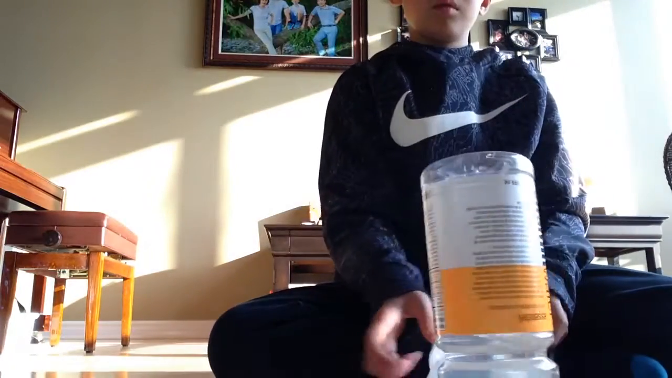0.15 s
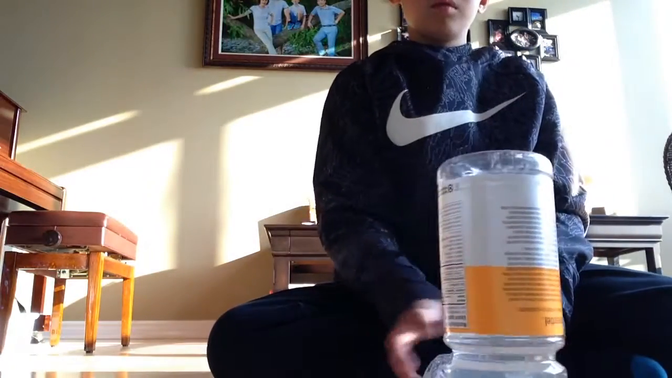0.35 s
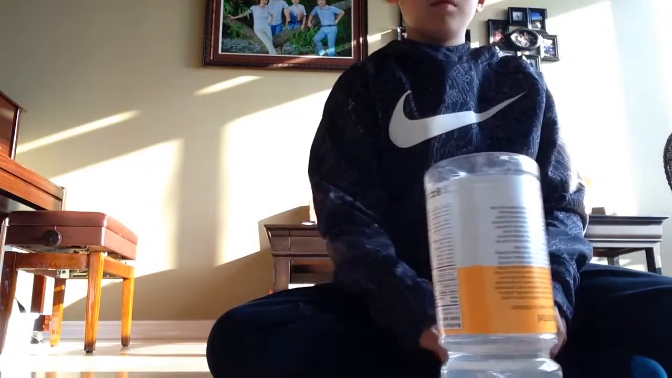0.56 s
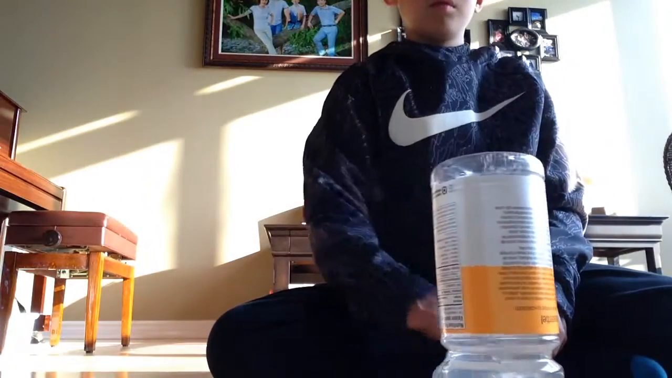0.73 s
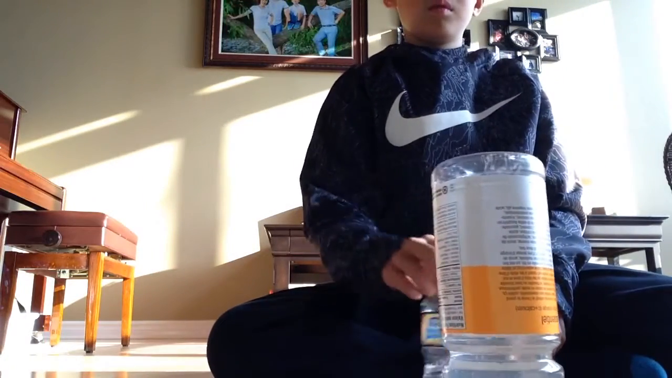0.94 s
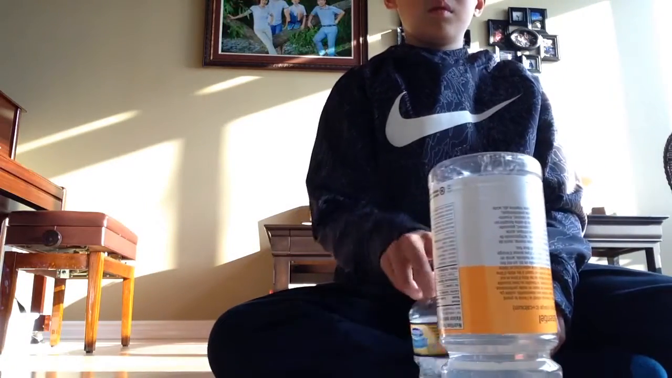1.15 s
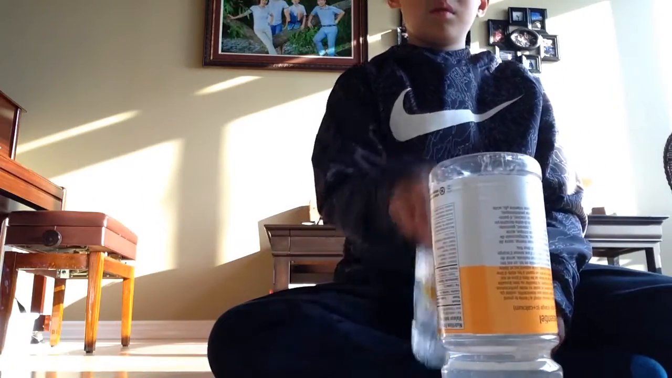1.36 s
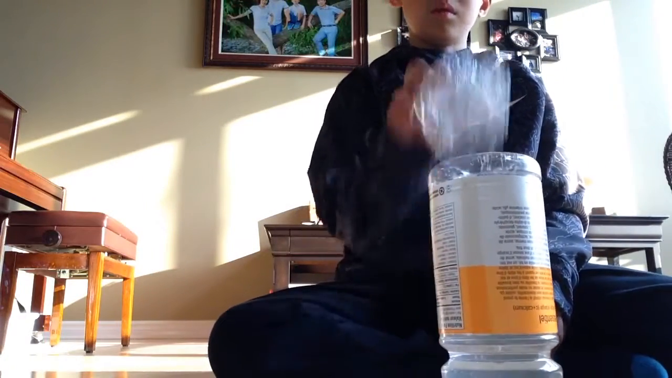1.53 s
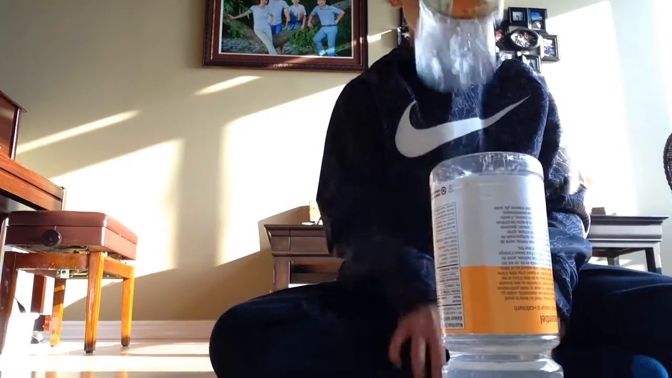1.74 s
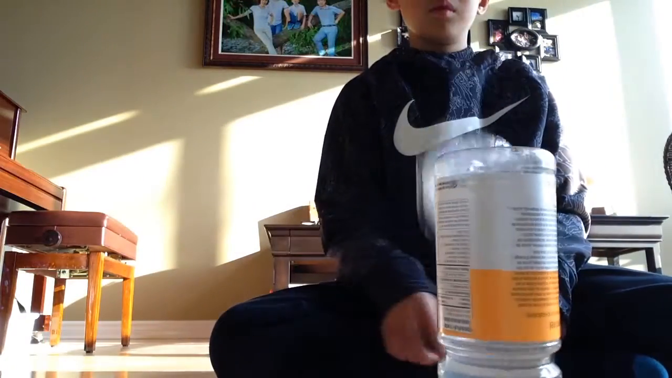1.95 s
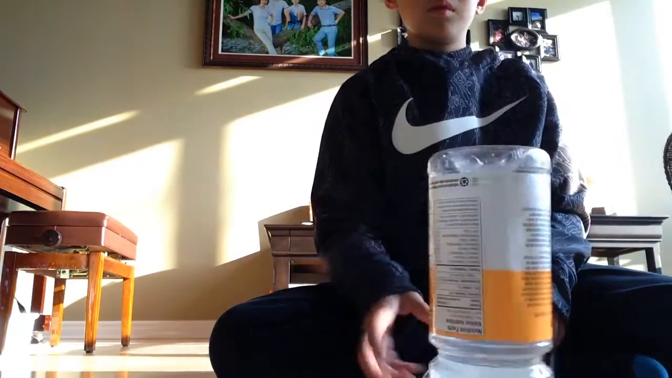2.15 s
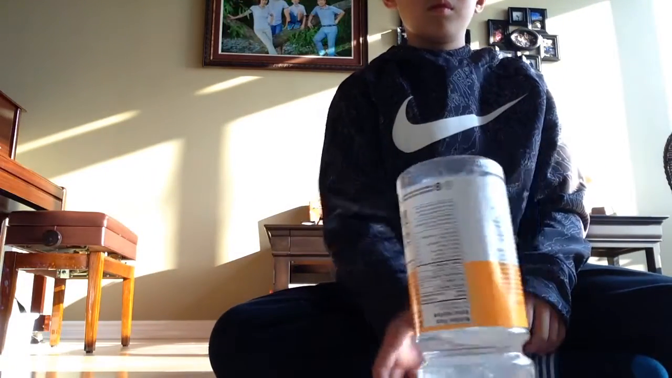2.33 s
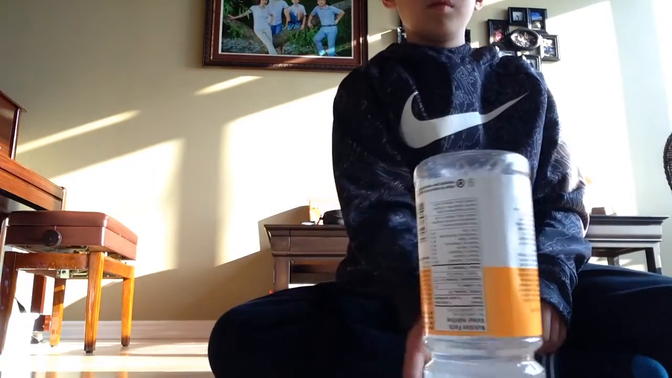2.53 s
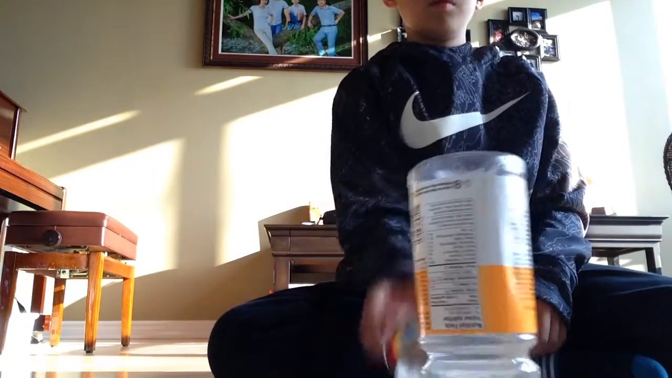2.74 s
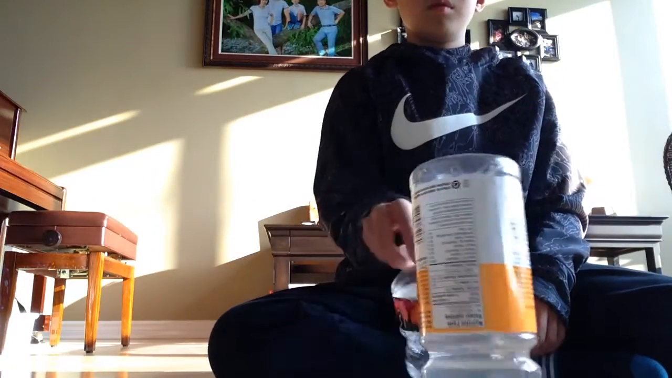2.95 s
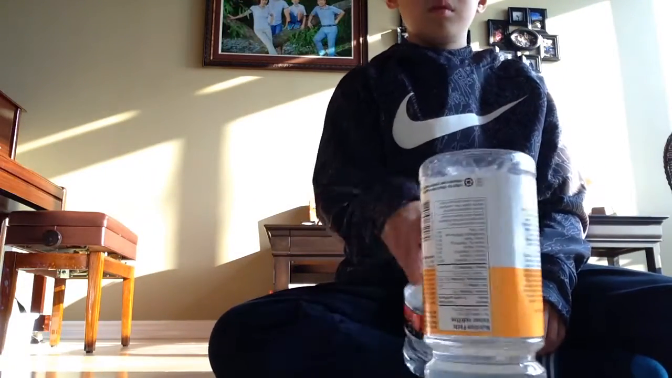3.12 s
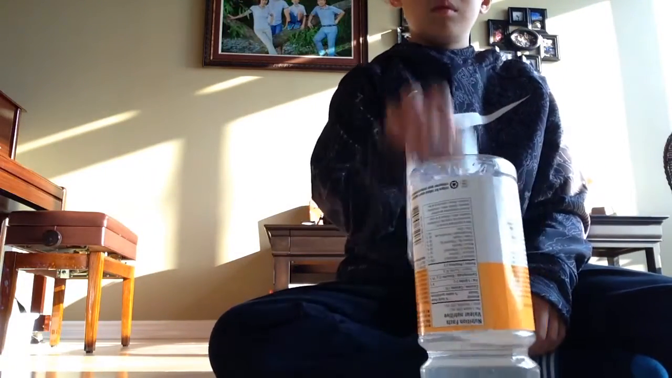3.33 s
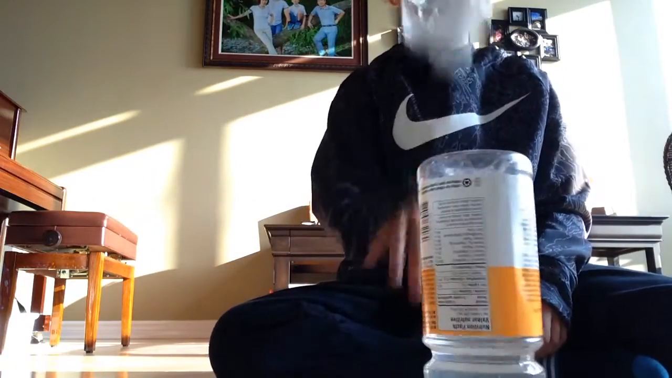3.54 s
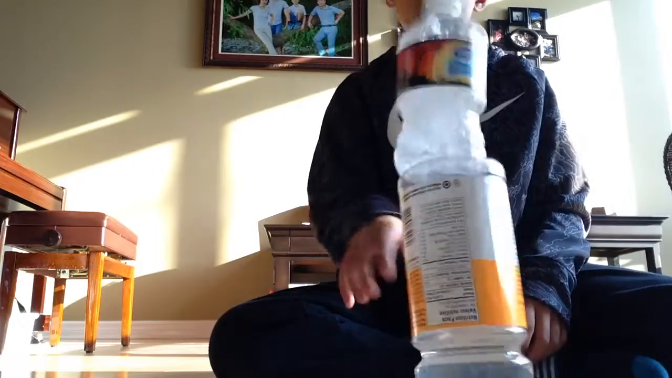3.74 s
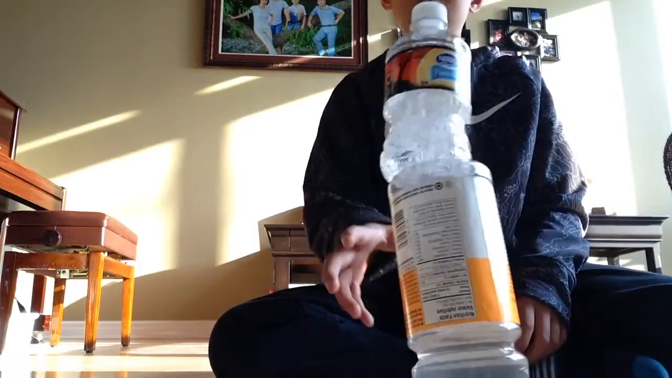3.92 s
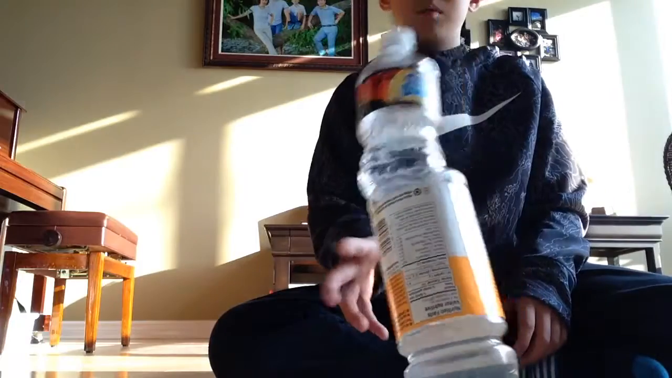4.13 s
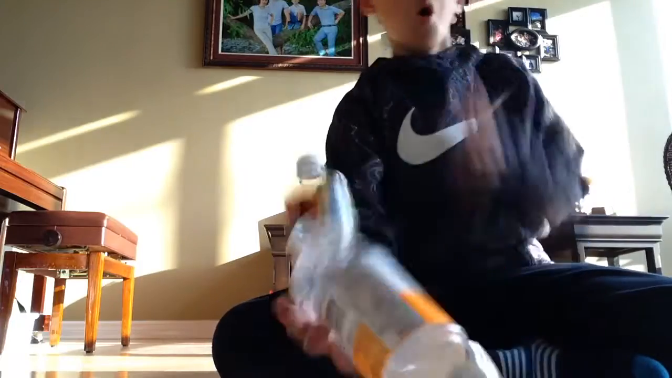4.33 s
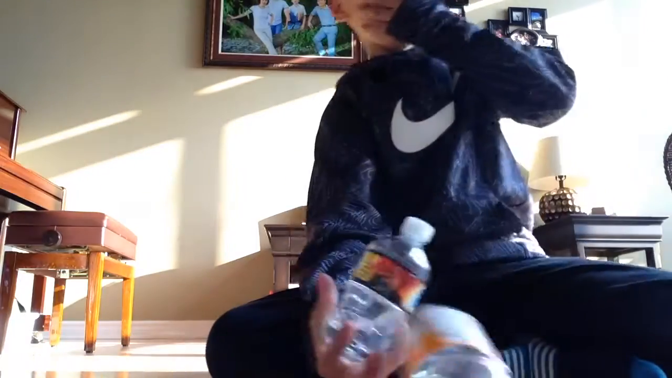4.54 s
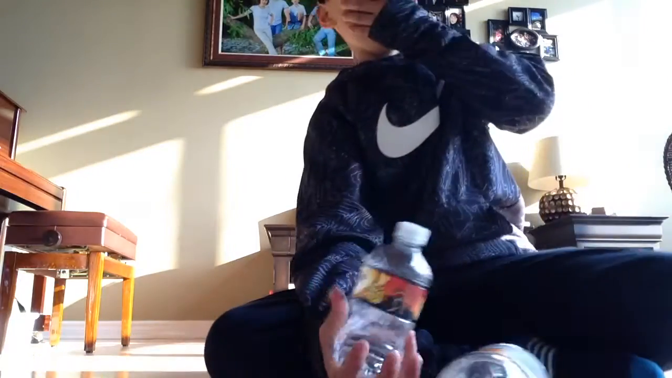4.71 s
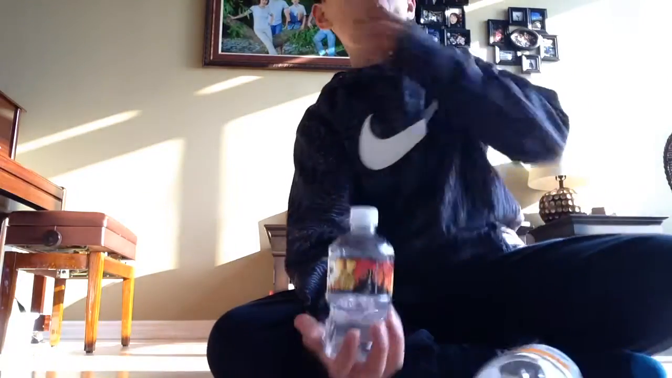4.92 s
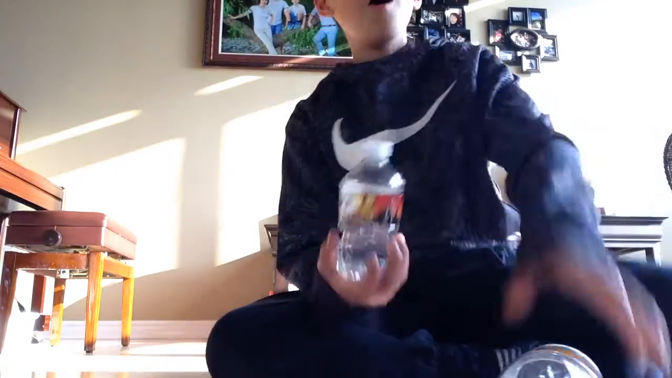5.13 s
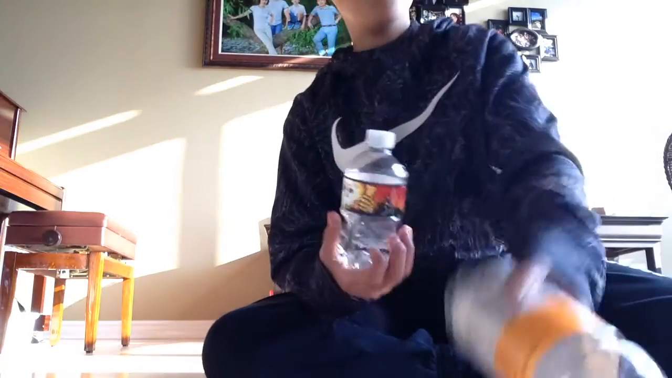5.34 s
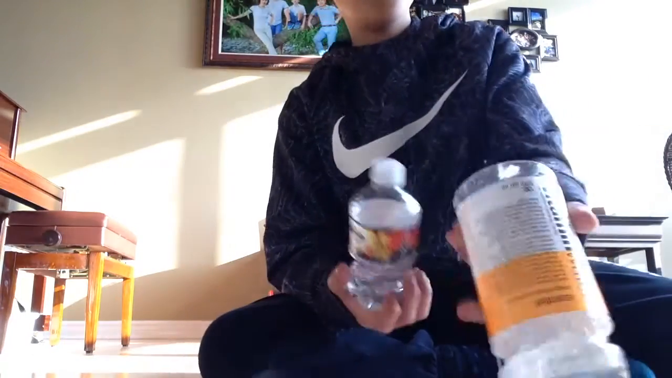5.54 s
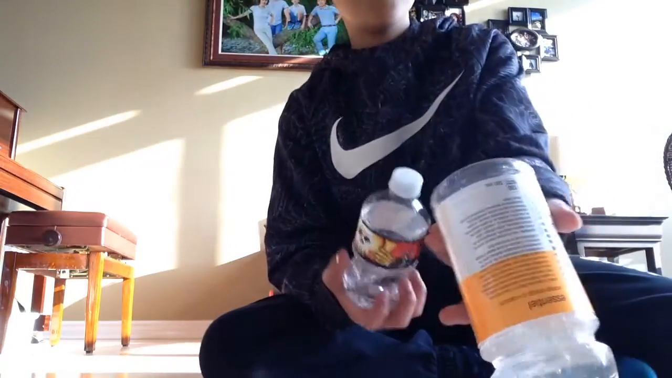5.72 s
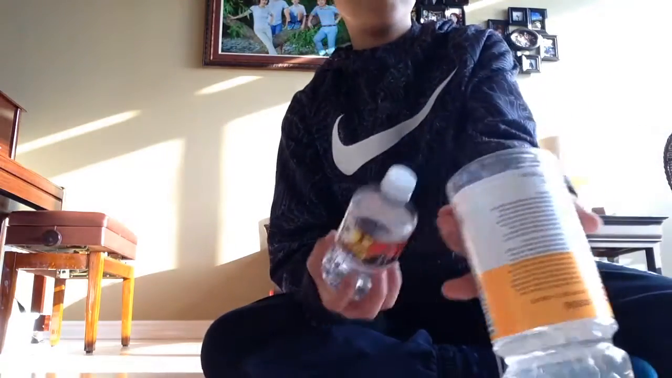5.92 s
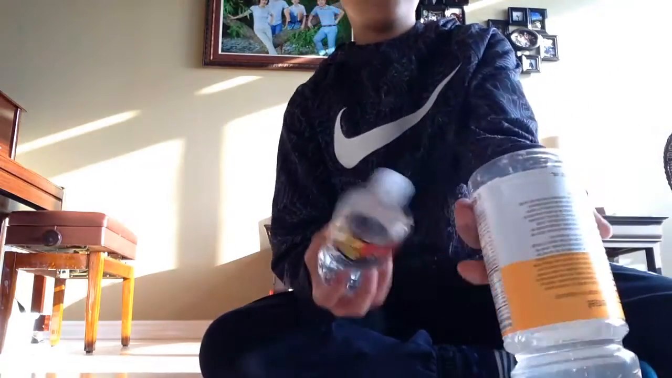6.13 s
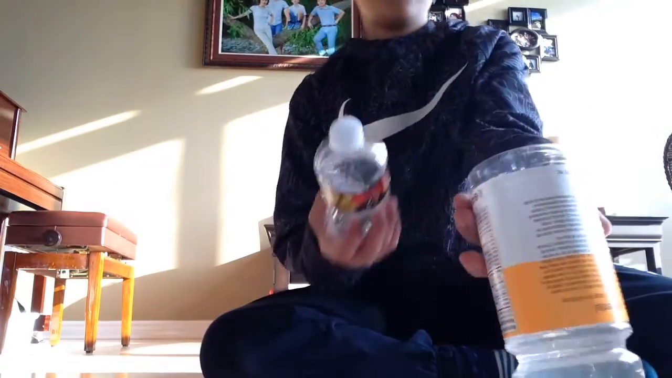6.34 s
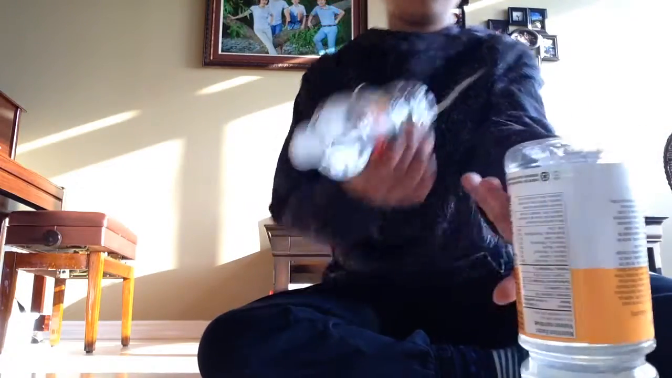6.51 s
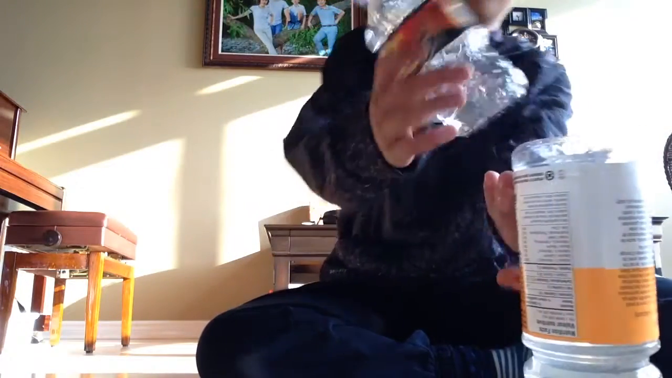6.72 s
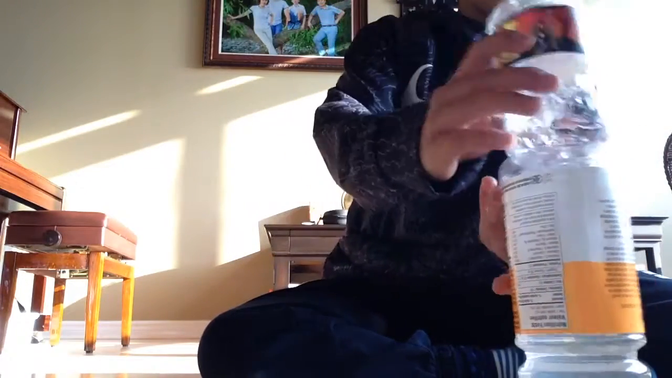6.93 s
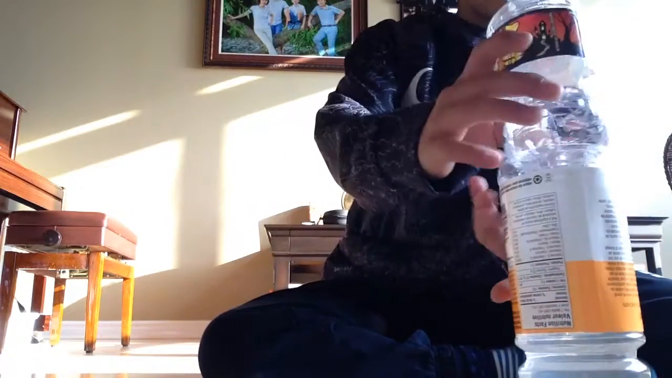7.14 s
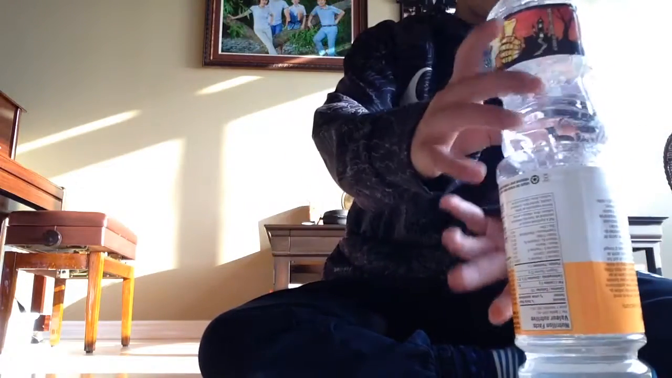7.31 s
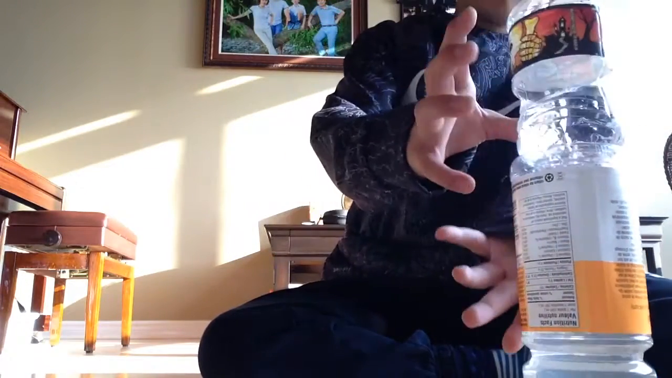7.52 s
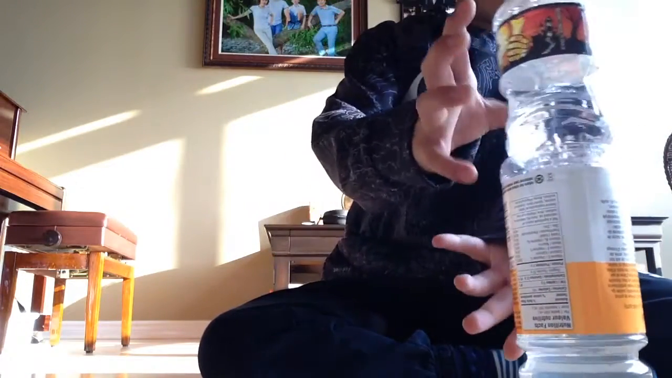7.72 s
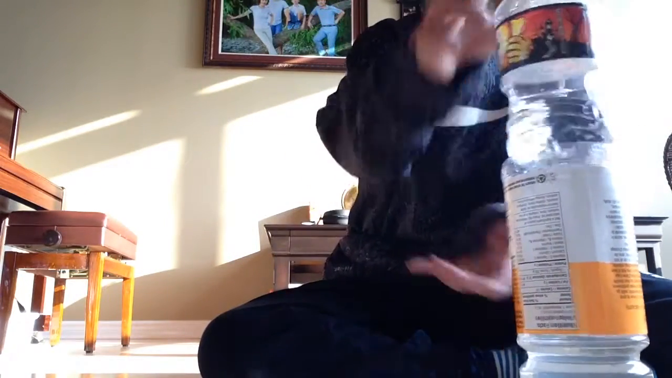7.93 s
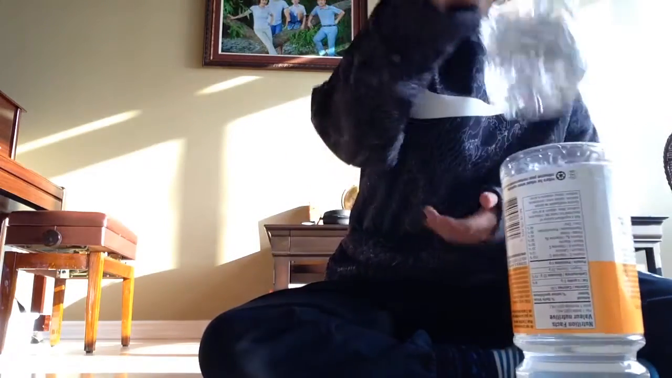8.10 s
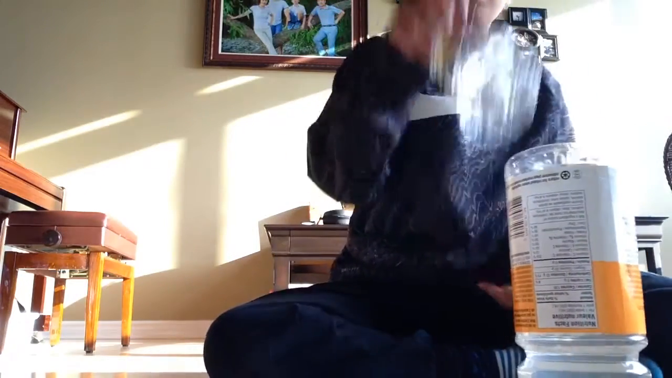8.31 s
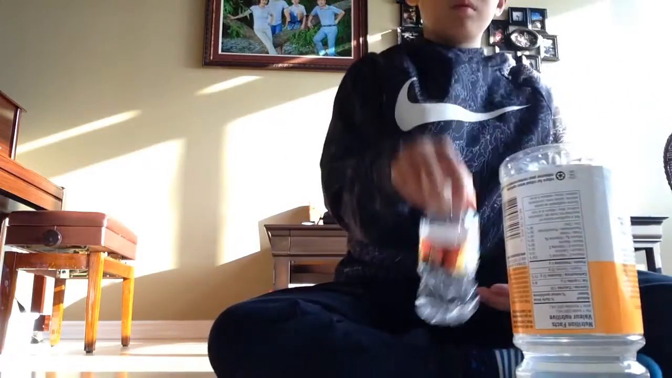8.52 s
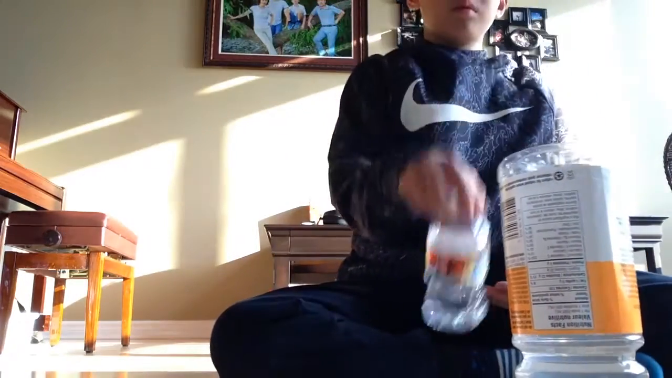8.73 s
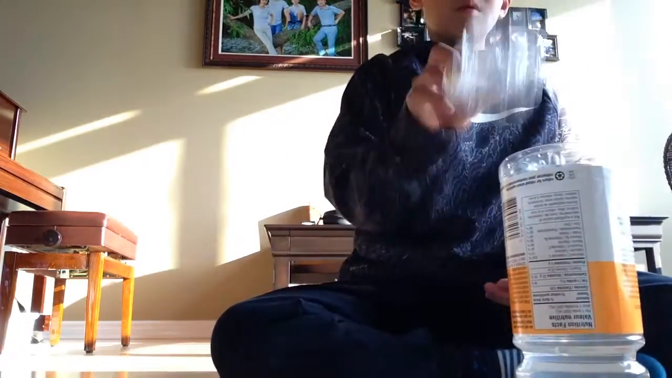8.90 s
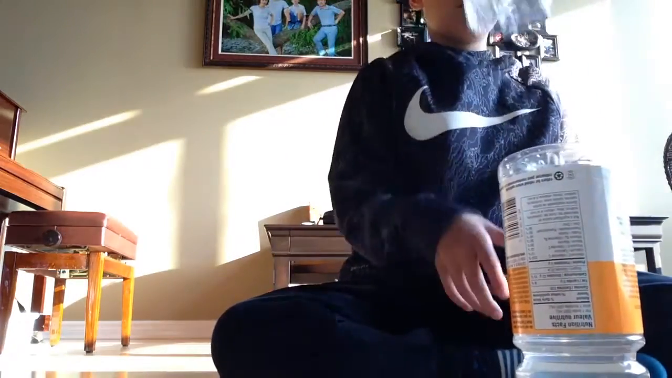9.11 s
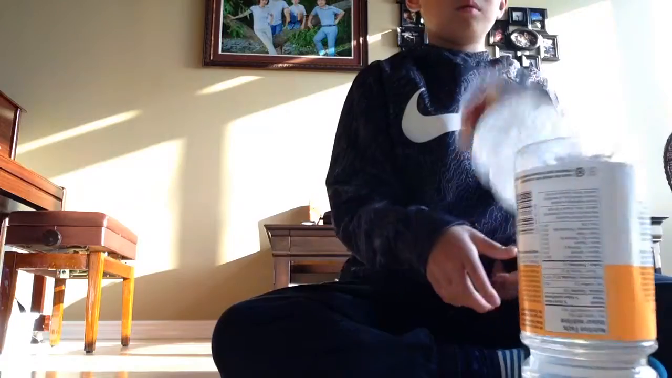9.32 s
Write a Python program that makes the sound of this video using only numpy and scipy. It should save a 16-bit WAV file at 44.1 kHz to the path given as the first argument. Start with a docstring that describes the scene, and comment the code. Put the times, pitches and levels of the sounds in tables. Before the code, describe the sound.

A part-filled plastic bottle lands repeatedly on a hollow plastic jug with loud close booms, water slapping and spattering inside, amid crinkles and rustles.

```python
"""Flipping a water bottle

A part-filled plastic water bottle is flipped onto a big upturned plastic jug, close to the microphone in a
living room. Each landing booms the hollow plastic (damped vibrations); softer follow-up booms come just after
it and the water spatters inside (clouds of tiny drop sounds). Once the jug tips, rolls and falls, as rumbling,
scraping noise. Between throws hands pick up the crinkling bottle and sleeves rustle, as swelling noise. The
loudest blows overload the microphone."""
import sys
import numpy as np
from scipy import signal
from scipy.fft import rfft, irfft, next_fast_len
from scipy.io import wavfile
from scipy.ndimage import map_coordinates

SR = 44100
rng = np.random.default_rng(int(sys.argv[2]) if len(sys.argv) > 2 else 0)


def wrap_up_sound(samples):
    """Save the sound to the file named by the first command line argument, as 16-bit audio."""
    columns = np.atleast_2d(samples).T
    # keep every value between -1 and 1, then stretch to whole-number steps
    tamed = np.clip(columns, -1, 1)
    steps = np.round(tamed * 32767).astype(np.int16)
    wavfile.write(sys.argv[1], SR, steps)


N = 417186  # length in samples
TOP_HZ = 15450  # upper limit of the microphone and of the drop pitches
TIME = np.arange(N) / SR  # s, over the whole scene
AGE = np.arange(SR // 2) / SR  # s, since a sound began


def amp(db):
    """Decibels to gain."""
    return 10 ** (np.asarray(db) / 20)


def unit(x):
    """Scale to rms 1."""
    return x / np.sqrt(np.mean(x ** 2) + 1e-20)


def crest(x):
    """Scale to peak 1."""
    return x / (np.abs(x).max() + 1e-20)


def along(points, hz):
    """Read a curve of (f/Hz, value) points, with straight lines between them on a log pitch axis."""
    f, v = np.transpose(points)
    return np.interp(np.log(hz + 1), np.log(f + 1), v)


def fade(t, t60):
    """Exponential decay, 60 dB in t60."""
    return np.exp(-np.log(1000) * t / t60)


def add(track, s, sound):
    """Mix a sound into a track at time s."""
    start = max(round(s * SR), 0)
    track[start:start + len(sound)] += sound[:N - start]


def coloured(x, spectrum):
    """Make some pitches louder and others softer, by (f/Hz, level/dB) points."""
    m = next_fast_len(len(x) + SR // 10)
    gain = amp(along(spectrum, np.fft.rfftfreq(m, 1 / SR)))
    return irfft(rfft(x, m) * gain, m)[:len(x)]


def noise(spectrum, size=N):
    """Coloured noise of rms 1."""
    return unit(coloured(rng.standard_normal(size), spectrum))


def wobble(rate):
    """A smooth random curve, with rate random points a second."""
    return map_coordinates(rng.standard_normal(int(N * rate / SR) + 4), [TIME * rate])


def stroke(s, length, rise_share=0.43, swell_db=21.5):
    """Gain of one movement: it swells to its peak at time s and dies away; its ends lie swell_db under the peak."""
    before = np.maximum(s - TIME, 0) / (rise_share * length)
    after = np.maximum(TIME - s, 0) / ((1 - rise_share) * length)
    return amp(-swell_db * np.minimum(before ** 2 + after, 10))


def mode(hz, t60, attack):
    """One damped vibration: a sine that starts softly and dies away."""
    return np.sin(2 * np.pi * hz * AGE) * fade(AGE, t60) * (1 - np.exp(-AGE / attack))


def ring(modes, attack, scatter_db, detune):
    """A set of vibrations, peak 1; levels and pitches vary as if struck at a new spot each time."""
    total = np.zeros(len(AGE))
    for hz, db, t60 in modes:
        level_chance, pitch_chance = rng.standard_normal(2)
        total += amp(db + scatter_db * level_chance) * mode(hz * (1 + detune * pitch_chance), t60, attack)
    return crest(total)


def drops(hz, spread, cycles, size_db, count):
    """A half-second cloud of tiny damped sines at random moments, pitches and sizes, rms 1."""
    when = rng.uniform(0, len(AGE), count).astype(int)
    pitch, size = rng.standard_normal(count), rng.exponential(1, count)
    k = np.arange(SR // 150)  # samples within one drop
    turns = np.minimum(hz * np.exp(spread * pitch), TOP_HZ)[:, None] * k / SR  # cycles since the drop began
    grains = np.sin(2 * np.pi * turns) * fade(turns, cycles) * (1 - np.exp(-turns))
    grains = amp(size_db * np.minimum(size, 4))[:, None] * grains
    cloud = np.bincount((when[:, None] + k).ravel(), grains.ravel(), len(AGE))
    return unit(cloud[:len(AGE)])


# how long the room's echo lasts at each pitch: (f/Hz, t60/s)
ROOM_DECAY = [(100, 0.8), (260, 0.44), (700, 0.85), (2000, 0.52), (5000, 0.047), (13000, 0.4)]
# how strongly the room echoes each pitch: (f/Hz, level/dB)
ROOM_COLOUR = [(40, -26), (100, -9), (170, 4), (260, -0.5), (420, -9.5), (700, -6), (2000, -7), (6000, 0),
               (15000, -10.5)]


def room_tail(gap=0.0042, build=0.0048):
    """The room's answer: noise that builds up after the direct sound, each pitch dying away at its own pace."""
    hz, t, z = signal.stft(rng.standard_normal(SR * 3 // 4), SR, nperseg=256)
    decay = fade(t, along(ROOM_DECAY, hz)[:, None])
    tail = signal.istft(z * decay, SR, nperseg=256)[1]
    tail = tail * np.clip((np.arange(len(tail)) / SR - gap) / build, 0, 1)
    return coloured(tail / np.linalg.norm(tail), ROOM_COLOUR)


# standing waves of the room: (f/Hz, level/dB, t60/s)
STANDING = [(160.2, 0, 0.35), (216, -9.5, 0.36), (244.6, 3.5, 0.5), (276.4, 0, 0.66), (325.3, -1.5, 0.29),
            (561, -6.5, 0.63)]


def in_room(sound, room_db, standing_db=4):
    """A sound followed by its reverberation: a diffuse tail and a few standing waves."""
    tail = room_tail()
    waves = ring(STANDING, attack=.012, scatter_db=2.0, detune=.003)
    add(tail, 0, amp(standing_db) * waves / np.sqrt(SR * 3))
    wet = amp(room_db) * signal.fftconvolve(sound, tail)
    return wet + np.pad(sound, (0, len(wet) - len(sound)))


# steady background of the room: (f/Hz, level/dB)
QUIET = [(15, -78), (25, -47.5), (53, -37), (76, -16), (127, -19), (175, -2.5), (200, -9), (277, -15),
         (354, -13), (384, -11.5), (624, -25), (1790, -31), (3080, -31), (13600, -34), (16000, -38)]


def quiet(rms_db=-60):
    """The quiet of the room is steady coloured noise."""
    return amp(rms_db) * noise(QUIET)


# air enclosed in the jug: (f/Hz, level/dB, t60/s)
AIR = [(414.2, 15.5, 0.17), (426.6, -7, .6), (910, -29, 0.19), (1500, -30.5, 0.38), (1974, -35.5, 0.27),
       (2260, -36.5, 0.26), (2840, -41, .3), (4704, -42, 0.17)]
# colour of rubbed hollow plastic, used here for the lingering noise too: (f/Hz, level/dB)
RUB = [(59, -61.5), (100, -31.5), (225, 4), (303, 2), (350, -5), (521, 4), (713, -15.5), (895, -13.5),
       (1240, -31), (1450, -18), (3000, -36), (3900, -44), (6600, -120)]


def lingering(air_db=-28, room_db=-41):
    """The jug's air and the room still ring from a landing just before: vibrations and fading noise."""
    track = np.zeros(N)
    add(track, 0, amp(air_db) * ring(AIR, attack=0.0018, scatter_db=2.5, detune=0.0022))
    add(track, 0, amp(room_db) * noise(RUB, size=len(AGE)) * fade(AGE, t60=0.95))
    return track


# water thrown about inside the bottle, before the trims below:
# (t/s, slosh level/dB, spatter level/dB, fine spray level/dB)
SPLASHES = [(0, -45.5, -41.5, -51), (0.075, -36.5, -46.5, -52.5), (0.254, -40.5, -47.5, -72),
            (1.683, -70, -55.5, -56), (1.84, -44.5, -45, -46), (2.125, -24.5, -42, -47.5),
            (3.723, -36.5, -45, -41.5), (4.652, -39, -38, -44.5), (5.375, -39, -54.5, -64.5),
            (9.255, -40, -42.5, -46)]


def splashes(slosh_t60=.55, spatter_t60=0.43, spray_t60=.27, burst_db=2, spatter_trim_db=5.0, spray_trim_db=0.5):
    """Water breaks up against the wall; the finest drops come in a burst and settle first."""
    track = np.zeros(N)
    for s, slosh_db, spatter_db, spray_db in SPLASHES:
        slosh = drops(hz=1550, spread=0.37, cycles=11, size_db=3.0, count=1200) * fade(AGE, slosh_t60)
        spatter = drops(hz=5350, spread=0.38, cycles=15, size_db=2.0, count=4000) * fade(AGE, spatter_t60)
        settling = fade(AGE, spray_t60) + amp(burst_db) * fade(AGE, t60=0.05)
        spray = drops(hz=12100, spread=0.16, cycles=8.3, size_db=2.0, count=3000) * settling
        water = amp(slosh_db) * slosh
        water += amp(spatter_db + spatter_trim_db) * spatter
        water += amp(spray_db + spray_trim_db) * spray
        add(track, s, in_room(water * (1 - np.exp(-AGE / 0.0035)), room_db=-3.0))
    return track


def boom(hz, t60=0.031, attack=0.00093, sway_db=-13, cut_hz=150):
    """The plastic base flexes for a few cycles and the water load sways slower; so small a body radiates no deep bass."""
    flex = mode(hz, t60, attack)
    sway = amp(sway_db) * mode(hz * .6, t60=0.052, attack=0.0094)
    no_bass = signal.butter(2, cut_hz, "highpass", fs=SR, output="sos")
    return crest(signal.sosfilt(no_bass, flex + sway))


# colour of clicking and creasing plastic: (f/Hz, level/dB)
CRACK = [(900, -21.5), (2300, 1.5), (3200, 3.5), (4000, -6.5), (4700, -7.5), (7000, -8), (14000, -15.5)]


def crack(t60=0.03, rattle_db=-14, rattle_t60=0.065, attack=0.0002, click_db=3, edge_db=-2):
    """The hard click and edge of a contact are noise; the creased wall crackles briefly, as tiny damped sines."""
    strike = amp(click_db) * fade(AGE, t60=0.0055) + amp(edge_db) * fade(AGE, t60)
    edge = noise(CRACK, size=len(AGE)) * strike * (1 - np.exp(-AGE / attack))
    crackle = drops(hz=5500, spread=.55, cycles=4, size_db=7, count=450)
    return edge + amp(rattle_db) * crackle * fade(AGE, rattle_t60)


# thin plastic wall: (f/Hz, level/dB, t60/s)
WALL = [(859, 7, 0.02), (994, -1.5, .025), (1126, -3.5, .022), (1383, -4.5, 0.023), (1690, -9.5, 0.011),
        (1915, -9, 0.028), (2360, -12, 0.008)]


def contact(db, hz, knock_db, crack_db, air_db, room_db):
    """One contact booms, knocks, cracks and sets the enclosed air ringing."""
    hit = amp(db) * boom(hz)
    hit += amp(knock_db) * ring(WALL, attack=0.0004, scatter_db=0.5, detune=0.051)
    hit += amp(crack_db) * crack()
    sound = in_room(hit, room_db)
    add(sound, 0, amp(air_db) * ring(AIR, attack=0.024, scatter_db=1.0, detune=.002))
    return sound


# hard contacts of bottle, jug and floor, before the boom and crack trims below:
# (t/s, boom level/dB, boom f/Hz, wall knock level/dB, crack level/dB, air ring level/dB, room level/dB)
BLOWS = [(0.0713, 3, 420, -11.5, -27.5, -20, -6), (0.2515, -6.5, 414, -11.5, -25.5, -27.5, -10.5),
         (1.0608, -8.5, 411, -17.5, -45, -40, -11), (1.832, -0.5, 450, -14, -25.5, -6.5, -5.5),
         (2.094, -5, 495, -2.5, -23.5, -26, 0), (2.127, -5.5, 324, -14.5, -29.5, -33, -1.5),
         (3.621, -34, 324.5, -38, -36, -38, -5), (3.722, 0.5, 404, -9.5, -22.5, -13.5, -6.5),
         (4.344, -21, 565, -22.5, -41.5, -19, -3.5), (4.408, -6, 400, -7.5, -46.5, -14.5, -9),
         (4.4177, -10.5, 582, -6, -49, -24, -20.5), (4.4259, -6.5, 545, -15.5, -56, -18, -17.5),
         (4.5311, -12.5, 538, -12, -49.5, -33, -22.5), (4.5504, -5, 548, -9.5, -50.5, -35.5, -7.5),
         (4.648, -3, 386, -10, -20.5, -18, -5), (5.3696, -1.5, 513, 3, -31.5, -19.5, -12),
         (5.544, -3.5, 316, -17.5, -50.5, -26.5, -15.5), (6.881, -28, 422, -33, -34, -67, -1.5),
         (9.249, 2, 446, -9.5, -22.5, -22, -4.5)]


def blows(boom_trim_db=1.5, crack_trim_db=3):
    """Bottle and jug land, bounce and topple: each hard contact shakes base, wall and enclosed air."""
    track = np.zeros(N)
    for s, db, hz, knock_db, crack_db, air_db, room_db in BLOWS:
        hit = contact(db + boom_trim_db, hz, knock_db, crack_db + crack_trim_db, air_db, room_db)
        add(track, s, hit)
    return track


# softer follow-up contacts just after a landing, before the boom trim below: (t/s, boom level/dB, boom f/Hz)
FOLLOW_UPS = [(0.0776, -5.5, 240), (0.0888, -6, 448), (0.262, -12.5, 270), (1.0846, -15.5, 351),
              (1.121, -29, 335), (1.8466, -4, 376), (1.864, -5.5, 426), (2.104, -9.5, 287), (3.735, -8, 300),
              (3.748, -7, 387), (3.775, -12, 198), (4.659, -10, 276), (4.68, -8, 360), (5.382, -4.5, 569),
              (5.397, -11, 260), (5.428, -22, 380), (5.558, -9, 328), (9.261, -5.5, 435), (9.278, -3.5, 244)]


def follow_ups(boom_trim_db=1.5, knock_db=-18, crack_db=-36, air_db=-23):
    """Softer follow-up contacts boom just after a landing, and fill the room as much as the blow before them."""
    track = np.zeros(N)
    for s, db, hz in FOLLOW_UPS:
        room_db = [blow[-1] for blow in BLOWS if blow[0] < s][-1]
        # follow-ups are gentle: knock, crack and air all lie well under the boom
        add(track, s, contact(db + boom_trim_db, hz, db + knock_db, db + crack_db, db + air_db, room_db))
    return track


def crinkle(per_s=250, size_db=4):
    """Tiny creases of thin plastic tick at random, rms 1."""
    size = amp(size_db * np.minimum(rng.exponential(1, N), 3))
    ticks = (rng.random(N) < per_s / SR) * size
    return unit(coloured(ticks, CRACK))


# cloth of the sleeve: (f/Hz, level/dB)
SLEEVE = [(500, -19), (1100, 7), (2500, 2.5), (4500, -4), (9000, -27), (15000, -31)]
# swishing water, also the grit under the rim: (f/Hz, level/dB)
SWISH = [(2500, -21), (5500, 1), (10000, -3), (15000, 0.5)]
# hand movements, timed at their fastest, before the trims below:
# (t/s, length/s, plastic rubbing level/dB, sleeve rustle level/dB, water swish level/dB)
HANDLING = [(0.526, 0.26, -49, -59.5, -72), (0.607, 0.14, -45, -53, -56.5), (0.806, 0.18, -37.5, -56, -66),
            (0.939, 0.089, -42.5, -52.5, -61), (1.595, 0.1, -40.5, -57, -67),
            (1.699, 0.047, -38.5, -52, -35), (2.664, 0.13, -46.5, -58.5, -77),
            (2.749, 0.086, -39, -54, -75.5), (3.46, 0.088, -39.5, -53, -73), (5.239, 0.037, -35, -59, -61),
            (5.295, 0.13, -33.5, -40.5, -46.5), (5.635, 0.25, -49, -49, -52), (5.737, 0.15, -40, -56, -62),
            (6.478, .14, -46.5, -84, -50), (6.548, 0.13, -52.5, -56.5, -50.5), (6.985, 0.14, -41, -51, -50),
            (7.075, 0.086, -37.5, -54, -53), (7.245, 0.12, -49, -71.5, -72),
            (7.967, 0.17, -38, -64.5, -54.5), (8.08, 0.071, -32, -52.5, -59), (8.975, .1, -44, -56.5, -74)]


def handling(rub_db=-3, rustle_db=-5, crinkle_db=-6, swish_db=-3):
    """Fingers stick and slip on the hollow plastic; as the sleeve brushes along the wall crinkles, and the water swishes."""
    rub, rustle, swish = sum(amp(levels)[:, None] * stroke(s, length) for s, length, *levels in HANDLING)
    plastic = amp(rub_db) * rub * unit(noise(RUB) * amp(1.7 * wobble(70)))
    creases = amp(crinkle_db) * rustle * crinkle()
    cloth = amp(rustle_db) * rustle * unit(noise(SLEEVE) * amp(4.1 * wobble(200)))
    water = amp(swish_db) * swish * unit(noise(SWISH) * amp(4 * wobble(300)))
    return in_room(plastic + creases + cloth + water, room_db=-5)[:N]


# thin plastic snapping under the fingers, before the trim below: (t/s, peak level/dB, f/Hz)
SNAPS = [(0.839, -29.5, 2160), (0.987, -43, 2460), (1.581, -38, 2680), (1.597, -29.5, 2340),
         (1.6842, -31, 2810), (3.4506, -51, 3160), (3.4748, -29.5, 3940), (3.569, -44, 6150),
         (4.391, -26.5, 2040), (5.0238, -38.5, 4820), (5.2966, -32.5, 2320), (5.5387, -25.5, 2000),
         (5.5932, -36.5, 6850), (5.716, -43, 8700), (5.737, -36, 1580), (5.7518, -39, 4120),
         (7.0122, -35, 4590), (6.938, -30.5, 2920), (7.067, -37, 6200), (7.089, -47, 4800),
         (7.1646, -42, 5780), (7.953, -40, 4200), (8.9726, -31, 2580), (9.1389, -43.5, 2550),
         (9.166, -41, 3100)]


def snaps(trim_db=-1, burst_db=-6, upper_db=-5, lower_db=-5):
    """A small dent pops: three short pitches in a burst of noise."""
    track = np.zeros(N)
    for s, db, hz in SNAPS:
        burst_colour = [(hz / 8, -20), (hz / 2, -4), (hz, 0), (hz * 3, -12)]
        burst = noise(burst_colour, size=len(AGE)) * fade(AGE, t60=0.0067)
        dent = mode(hz, t60=0.015, attack=.0003)
        dent += amp(upper_db) * mode(hz * 1.48, t60=.011, attack=.0003)
        dent += amp(lower_db) * mode(hz * .6, t60=0.012, attack=.0003)
        pop = crest(dent + amp(burst_db) * burst)
        add(track, s, in_room(amp(db + trim_db) * pop, room_db=-2.5))
    return track


# air pockets gulping in the water: (t/s, peak level/dB, starting f/Hz, cycles to fade by 60 dB)
GULPS = [(1.209, -29.5, 333, 40), (2.98, -55, 1476, 39), (6.634, -34.5, 1016, 9.6),
         (7.222, -50.5, 1300, 14)]


def gulps(rise=0.0022):
    """A bubble rings for some cycles and its pitch climbs as it nears the surface."""
    track = np.zeros(N)
    for s, db, hz, cycles in GULPS:
        climbing = hz * (1 + rise * np.minimum(hz * AGE, cycles))
        bubble = crest(mode(climbing, cycles / hz, attack=1 / hz))
        add(track, s, in_room(amp(db) * bubble, room_db=-6))
    return track


# stiff cap and neck: (f/Hz, level/dB, t60/s)
CAP = [(1490, -6.5, .016), (1780, 1.5, 0.018), (2030, 0.5, .016), (2340, 1, .015), (2760, -2, 0.012),
       (3330, -2.5, 0.017), (4700, -9.5, 0.0072), (7600, -12.5, .007), (11530, -14, .006)]
# the hard cap or rim strikes: (t/s, peak level/dB, room level/dB)
CLACKS = [(2.0939, 4, -11), (2.1269, -6, -5), (4.6514, -19, 6), (9.249, -14.5, 0)]


def clacks():
    """Stiff plastic rings high and short, and fills the room."""
    track = np.zeros(N)
    for s, db, room_db in CLACKS:
        clack = amp(db) * ring(CAP, attack=0.000067, scatter_db=3.0, detune=0.029)
        add(track, s, in_room(clack, room_db))
    return track


# light nudges while bottle and jug are set in place, before the boom trim below:
# (t/s, boom level/dB, boom f/Hz, wall knock level/dB, air ring level/dB)
NUDGES = [(2.528, -33, 405, -32, -41), (2.766, -33.5, 297, -40, -49), (3.014, -33.5, 263, -37.5, -45),
          (3.232, -41, 406, -44.5, -45), (3.443, -37.5, 414, -43, -40), (3.475, -35, 492, -37, -59),
          (5.267, -16, 298, -40, -41), (6.941, -15.5, 416, -32, -30), (7.058, -26.5, 486, -32, -48),
          (7.954, -32.5, 440, -39, -62), (7.992, -36, 325, -43, -47.5), (8.033, -31.5, 411, -37.5, -33.5),
          (8.079, -16, 470, -32, -56), (8.48, -35.5, 261, -57, -58), (8.569, -35.5, 266, -56, -57),
          (8.612, -39, 269, -63, -66)]


def nudges(boom_trim_db=1.5, crack_db=-23, room_db=-13.5):
    """Gentle contacts: the faint crack's level follows the knock of the wall, crack_db from it."""
    track = np.zeros(N)
    for s, db, hz, knock_db, air_db in NUDGES:
        add(track, s, contact(db + boom_trim_db, hz, knock_db, knock_db + crack_db, air_db, room_db))
    return track


# colour of the jug's rumbling rim: (f/Hz, level/dB)
RIM = [(59, -64), (100, -23.5), (241, -1.5), (281, -1.5), (407, 1.5), (454, -6.5), (572, -3.5),
       (779, -30.5), (982, -18.5), (1380, -37), (1880, -32), (2060, -40), (4000, -53), (5200, -64),
       (8800, -120)]
# the rim scrapes over floor grit, timed at the loudest: (t/s, length/s, level/dB)
SCRAPES = [(4.347, 0.033, -39.5), (4.421, 0.16, -46.5), (4.543, 0.22, -54)]


def roll(tip_s=4.174, topple_s=4.402, fall_db=-22, growth_db=40, bump_db=2.5, grit_db=5, lift_t60=0.016):
    """The ribbed rim rumbles and scrapes over the floor, louder as the jug leans over, until it topples."""
    upright = np.clip((topple_s - TIME) / (topple_s - tip_s), 0, 2)  # 1 at the first lean, 0 at the fall
    level = amp(fall_db - growth_db * upright ** 2) * fade(np.clip(TIME - topple_s, 0, 1), lift_t60)
    rumble = level * unit(noise(RIM) * amp(bump_db * wobble(83)))
    scraping = sum(amp(db) * stroke(s, length) for s, length, db in SCRAPES)
    grit = scraping * unit(noise(SWISH) * amp(grit_db * wobble(530)))
    return in_room(rumble + grit, room_db=-6)[:N]


def scene():
    """Bottles and hands over the quiet of the room."""
    plastic = lingering() + blows() + snaps() + clacks() + nudges() + roll()
    water = splashes() + follow_ups() + gulps()
    return (quiet() + plastic + water + handling())[None]


def record(dry, low_cut_hz=85):
    """The microphone sheds deep bass, flattens the loudest peaks and cuts steeply above its band limit."""
    no_bass = signal.butter(2, low_cut_hz, "highpass", fs=SR, output="sos")
    thin = signal.sosfilt(no_bass, dry)
    clipped = thin / (1 + np.abs(thin) ** 10) ** (1 / 10)
    m = next_fast_len(N + SR // 2)
    band_loss = 1 + (np.fft.rfftfreq(m, 1 / SR) / TOP_HZ) ** 100
    return irfft(rfft(clipped, m) / band_loss, m)[..., :N]


dry = scene()
out = record(dry)
wrap_up_sound(out)
```